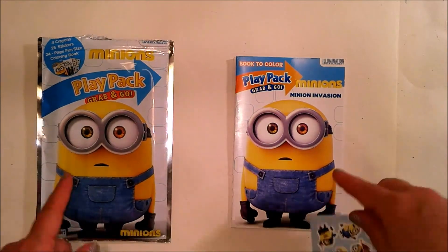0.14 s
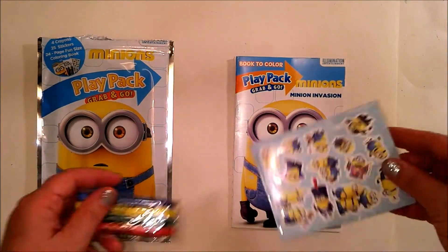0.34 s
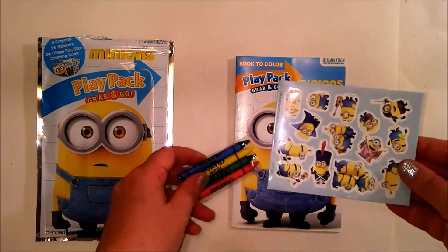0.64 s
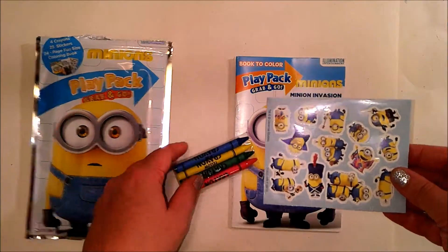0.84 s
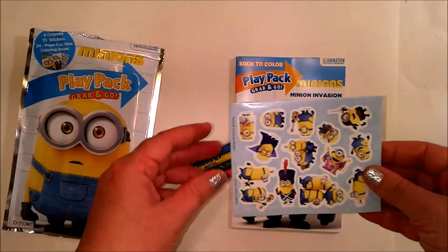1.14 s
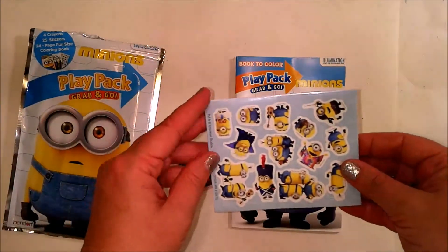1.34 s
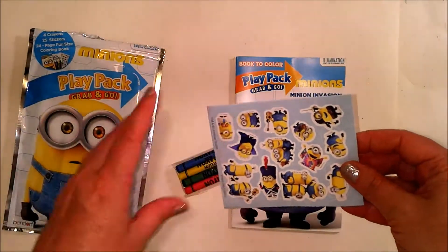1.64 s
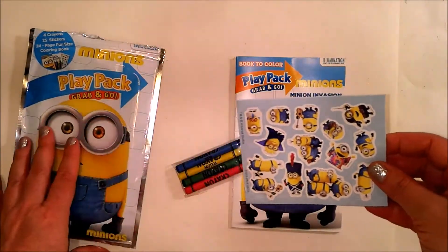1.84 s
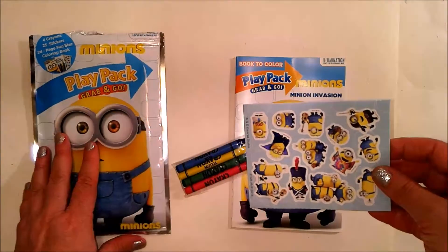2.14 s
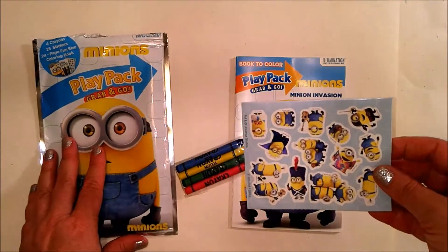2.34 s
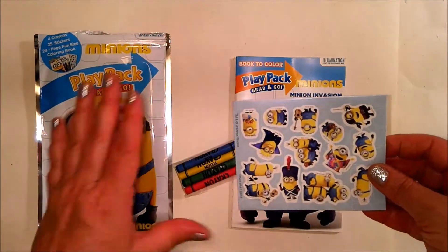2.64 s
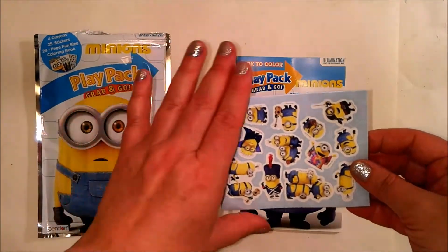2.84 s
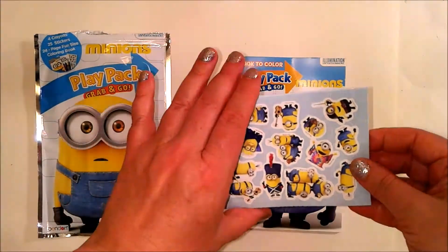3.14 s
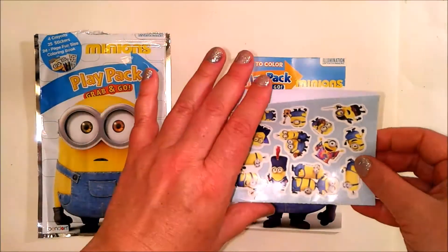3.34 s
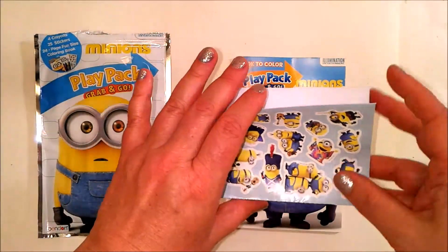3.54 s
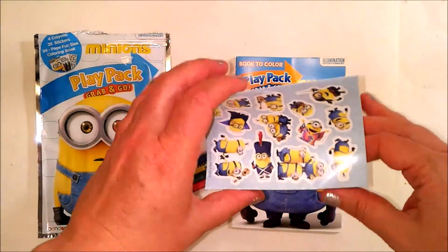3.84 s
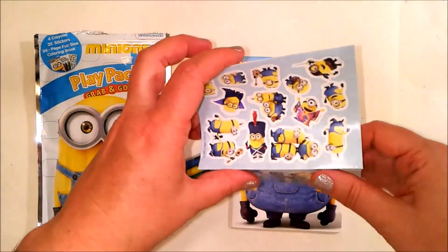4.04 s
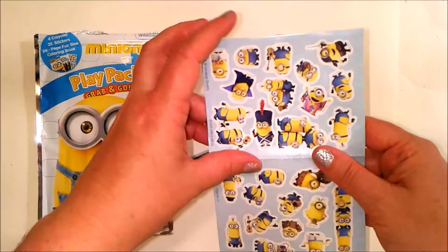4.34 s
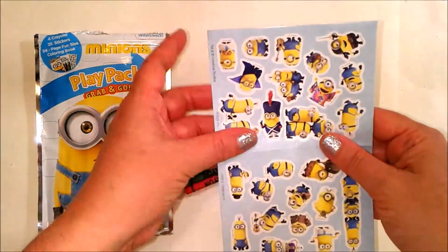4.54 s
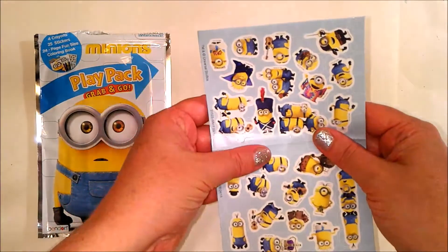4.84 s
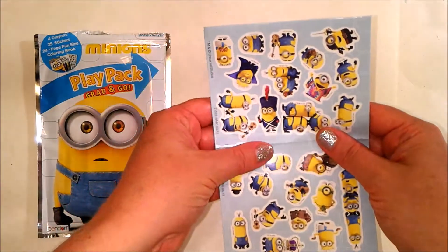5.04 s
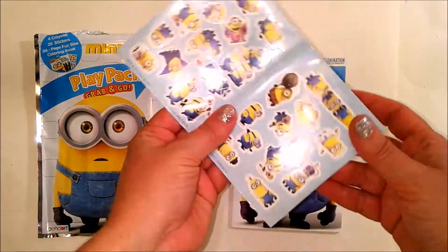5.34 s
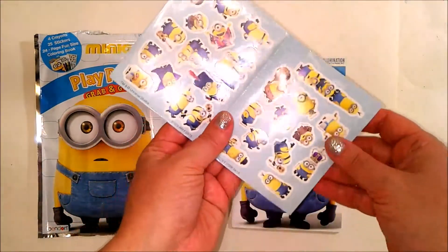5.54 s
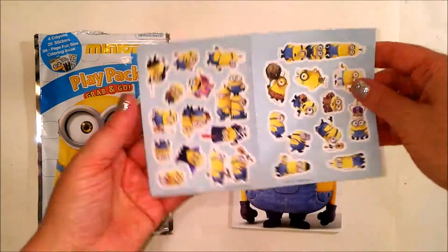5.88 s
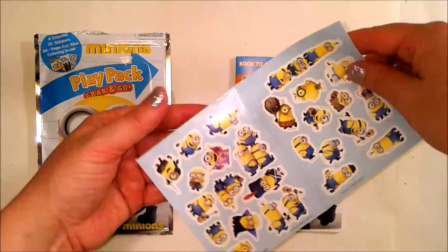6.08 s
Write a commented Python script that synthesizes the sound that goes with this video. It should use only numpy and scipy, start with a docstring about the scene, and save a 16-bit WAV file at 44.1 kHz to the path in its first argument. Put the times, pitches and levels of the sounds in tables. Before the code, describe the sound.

Close to a desk microphone in a small room, hands set crayons down with one woody knock and a quick rattle, the loudest sound. Light taps follow, and a foil pouch slides and snaps faintly. Fingers then rub and open a stiff sheet of stickers, which rustles quietly and pops dully as it bends. Low swells of stirred air come and go over a steady faint hiss, hum and whine.

```python
"""Light clicks and a low fingertip drone sound over the hiss, hum and whine of a close desk microphone.
A bundle of crayons clacks onto a table, exciting the top's normal modes, and rattles as it settles.
A foil pouch is pushed aside and a dent in it snaps through. Then a stiff sticker sheet is unfolded and
turned: stick-slip friction makes it hiss, and buckling makes it pop softly.
The hands stir slow swells of air, and a small room adds short reverberation."""
import sys
import numpy as np
from scipy import signal
from scipy.fft import rfft, irfft, next_fast_len
from scipy.io import wavfile

SR = 44100
rng = np.random.default_rng(int(sys.argv[2]) if len(sys.argv) > 2 else 0)


def to_wav(s):
    """Save 16-bit WAV."""
    ch = np.atleast_2d(s).T  # columns
    pcm = np.round(np.clip(ch, -1, 1) * 32767)  # PCM
    wavfile.write(sys.argv[1], SR, pcm.astype(np.int16))


N = 273816
TIME = np.arange(N) / SR


def undb(db):
    """Decibels to amplitude ratio."""
    return 10 ** (np.asarray(db) / 20)


def unit(x):
    """Normalisation to rms 1."""
    return x / np.sqrt(np.mean(x ** 2))


def add(out, start_s, x):
    """Superposition: x joins out from start_s."""
    i = int(start_s * SR)
    out[i:i + len(x)] += x[:N - i]


def convolve(x, response):
    """Convolution: x drives a linear system with this impulse response."""
    return signal.fftconvolve(x, response)[:len(x)]


def gains(points, size):
    """Frequency response at each transform bin, interpolated from (Hz, dB) points."""
    hz, db = np.transpose(points)
    bin_hz = np.arange(size // 2 + 1) * SR / size
    return undb(np.interp(np.log(bin_hz + 1), np.log(hz), db))


def colour(x, points):
    """Spectral shaping by (Hz, dB) points, at rms 1."""
    return unit(irfft(rfft(x) * gains(points, N), N))


def minimum_phase(points, size):
    """Minimum phase gives a (Hz, dB) spectrum its most compact impulse response."""
    cepstrum = irfft(np.log(gains(points, size)))
    cepstrum[1:size // 2] *= 2
    cepstrum[size // 2 + 1:] = 0
    return irfft(np.exp(rfft(cepstrum)))


def resonate(x, hz, width_hz, stages=1):
    """Resonance: identical damped oscillators in series, gain 1 at the centre."""
    for _ in range(stages):
        x = signal.lfilter(*signal.iirpeak(hz, hz / width_hz, fs=SR), x)
    return x


def decay(t, t60):
    """Exponential damping: 60 dB down after t60 seconds."""
    return np.exp(-np.log(1000) * t / t60)


def modes(table, size, polarity=1):
    """Free vibration is a sum of damped normal modes; polarity -1 alternates their signs."""
    t = TIME[:size]
    return sum(polarity ** k * undb(db) * np.sin(2 * np.pi * hz * t) * decay(t, t60)
               for k, (hz, db, t60) in enumerate(table))


def wander(per_second):
    """Random modulation: Gaussian values joined by straight lines."""
    return np.interp(TIME * per_second, np.arange(N), rng.standard_normal(N))


def swells(table):
    """An envelope of superposed Gaussian rises and falls."""
    return sum(undb(db) * np.exp(-((TIME - peak_s) / half_s) ** 2) for peak_s, half_s, db in table)


def slips(per_second, scatter_db):
    """Stick-slip friction as a Poisson train of impulses of uneven size."""
    strength = undb(scatter_db * np.minimum(rng.exponential(size=N), 5))
    return (rng.random(N) < per_second / SR) * strength * rng.standard_normal(N)


def reflections(x, t60_low=0.29, t60_high=0.25, near_s=0.0062, gap_s=0.0012):
    """Reverberation from the table and walls; absorption takes the treble first."""
    t = TIME[:SR // 2]
    noise = rng.standard_normal(len(t))
    low = signal.sosfilt(signal.butter(2, 1500, fs=SR, output="sos"), noise)
    tail = low * decay(t, t60_low) + (noise - low) * decay(t, t60_high)
    tail *= (t > gap_s) * (1 + 2 * np.exp(-t / near_s))  # the nearest surfaces answer loudest
    return convolve(x, tail / np.sqrt(np.sum(tail ** 2)))


def room(x, wet_db):
    """Direct sound plus the reverberant field."""
    return x + undb(wet_db) * reflections(x)


# Room rumble and microphone hiss. Each row: frequency in Hz, relative level in dB.
NOISE_FLOOR = [(20, 18), (32, 17), (46, 28), (62, 15.5), (85, 11), (160, 7), (450, -1.5), (1200, -2.5),
               (2900, -6), (4000, -12), (6800, -14.5), (10500, -5), (15500, -1.5)]
# Hum and faint whines. Each row: frequency in Hz, rms level in dB.
STEADY_TONES = [(59.5, -67), (806, -82.5), (1611, -101), (2681, -86)]


def background(floor_db=-59.5, whine_hz=4820, whine_width_hz=190, whine_db=-73):
    """Stationary noise: broadband rumble and hiss, a narrow whistling band and pure tones."""
    floor = undb(floor_db) * colour(rng.standard_normal(N), NOISE_FLOOR)
    band = resonate(rng.standard_normal(N), whine_hz, 2 * whine_width_hz)
    whine = undb(whine_db) * unit(resonate(band, whine_hz, whine_width_hz))
    tones = sum(undb(db) * np.sqrt(2) * np.sin(2 * np.pi * (hz * TIME + rng.random()))
                for hz, db in STEADY_TONES)
    return floor + whine + tones


# Fingertip drags. Each row: peak time in seconds, half length in seconds, level in dB.
FINGER_DRAGS = [(.1, 0.15, -71), (.7, 0.17, -65.5), (2.35, 0.16, -74.5), (3.8, 0.12, -74),
                (4.34, 0.24, -67), (6.18, 0.079, -63.5)]


def drags(hz=335, width_hz=115):
    """Forced vibration: soft fingertip slips drive one low bending mode of the card."""
    friction = slips(per_second=790, scatter_db=-6.0)
    return unit(resonate(friction, hz, width_hz, stages=2)) * swells(FINGER_DRAGS)


# The sharp edge of a click. Each row: frequency in Hz, gain in dB.
EDGE_SPECTRUM = [(200, 7), (1000, 0), (2200, 2), (4000, -2.5), (5600, 7.5), (6300, 5), (7700, -11),
                 (9000, -13), (10300, 2.5), (12700, 6), (15500, 3)]


def click(hz, width_hz, edge_db, contact_hz=7860, size=1024):
    """Impulse response of a small object: a damped ring and a sharp edge, band-limited by the contact."""
    ring = resonate(signal.unit_impulse(size), hz, width_hz, stages=2)
    edge = undb(edge_db) * minimum_phase(EDGE_SPECTRUM, size)
    return signal.sosfilt(signal.butter(4, contact_hz, fs=SR, output="sos"), 2 * ring - edge)


def disperse(x, hz=2400, width_hz=2200):
    """Dispersion: bending waves travel at unequal speeds, spreading a click over about a millisecond."""
    for _ in range(2):
        x = x - 2 * resonate(x, hz, width_hz)  # all-pass: only the phase changes
    return x


# Light contacts. Each row: start in seconds, gain in dB, ring frequency in Hz, ring bandwidth in Hz,
# relative edge gain in dB, share sent into the room in dB.
LIGHT_CONTACTS = [(0.0552, -27, 1390, 2670, -4.5, 0), (0.283, -35.5, 1900, 3000, -5.5, 4.5),
                  (0.4127, -24.5, 5670, 1800, -1, 0), (0.6999, -28, 3530, 4900, -6, 0.5),
                  (0.6991, -13.5, 2040, 790, -31, -1), (.751, -34, 2800, 3020, -8, 0),
                  (0.854, -21.5, 1710, 3580, -14, 4.5), (0.9104, -10, 1890, 1600, -19, -1),
                  (0.91, -24, 5800, 2000, -4, -8), (0.9126, 3.5, 1070, 327, -24, -6),
                  (.9133, -1.5, 1350, 450, -28, -2), (0.9142, -8, 2910, 1290, -30, -3),
                  (0.9226, -18, 2270, 1600, -26, 3), (0.967, -31, 2900, 1800, -6, -1),
                  (1.051, -36, 2190, 1400, -22, -1), (1.8701, -19.5, 2440, 3720, -5, -0.5),
                  (1.8726, -32, 3000, 3000, -2, 0), (1.926, -34, 3500, 2500, -10, -1),
                  (1.9797, -15, 1430, 300, -24, -2), (1.981, -16.5, 2260, 600, -11, -3),
                  (2.3775, -23, 3730, 3000, -2.5, -1), (2.392, -36, 4470, 4000, 0, -9),
                  (3.3646, -36, 2950, 5000, 0, 4), (4.294, -31, 1980, 3000, -21, -2),
                  (5.3798, -33.5, 2400, 4500, -2, -5), (5.427, -31.5, 3200, 4500, -2, -5),
                  (5.4692, -35, 3000, 5000, -2, -5), (5.5112, -36, 3400, 5000, -2, -5),
                  (5.8605, -33, 4800, 3960, 0.5, -5)]


def clicks():
    """Directivity: clicks of crayons, nails, foil and fold face either the microphone or the room."""
    direct, sent = np.zeros((2, N))
    for start_s, db, hz, width_hz, edge_db, room_db in LIGHT_CONTACTS:
        tick = undb(db) * click(hz, width_hz, edge_db)
        add(direct, start_s, tick)
        add(sent, start_s, undb(room_db) * tick)
    return disperse(direct + reflections(sent))


# Crayon striking crayon. Each row: start in seconds, gain in dB.
CRAYON_IMPACTS = [(.419, -25.5), (0.419, -51), (0.6996, -43)]
# Modes of the sticks. Each row: frequency in Hz, relative level in dB, 60 dB decay time in seconds.
CRAYON_MODES = [(5030, -28, 0.0017), (5650, -5.5, 0.015), (6030, -6.5, 0.015), (6800, -3.5, 0.0026),
                (8900, -5, 0.0029), (9850, -7, 0.0026), (10180, -2.5, 0.0028), (11500, -8, .0015),
                (14100, -6, .0007)]


def clacks():
    """Impact excitation: hard contacts ring the crayons' high modes for a few milliseconds."""
    out, ring = np.zeros(N), modes(CRAYON_MODES, SR // 20)
    for start_s, db in CRAYON_IMPACTS:
        add(out, start_s, undb(db) * ring)
    return signal.sosfilt(signal.butter(2, 3000, "high", fs=SR, output="sos"), out)


def stroke(start_s, rise_s, fall_s):
    """Friction noise grows as the square root of speed, which rises and falls in a smooth arch."""
    phase = np.interp(TIME, [start_s, start_s + rise_s, start_s + rise_s + fall_s], [0, np.pi / 2, np.pi])
    return np.sqrt(np.abs(np.sin(phase)))


def flicker(x, count=14, depth_db=2.3, per_second=40):
    """Amplitude modulation: as the contact patch shifts, each band swells and fades on its own."""
    size = next_fast_len(N, real=True)
    bin_hz = np.arange(size // 2 + 1) * SR / size
    place = np.interp(np.log(bin_hz + 1), np.log([1000, 12000]), [0, count - 1])
    spectrum = rfft(x, size)
    bands = (irfft(spectrum * np.maximum(1 - np.abs(place - k), 0), size)[:N] for k in range(count))
    return unit(sum(band * undb(depth_db * wander(per_second)) for band in bands))


# Bending modes of the stiff sheet. Each row: frequency in Hz, bandwidth in Hz, relative gain in dB.
SHEET_MODES = [(163, 220, 3.5), (337.6, 31, 8), (434, 41, 1), (626, 150, -1.5), (760, 87, 0.5),
               (980, 70, -6.5), (1540, 470, -1.5), (2590, 240, -6.5)]


def sheet(force):
    """A sounding board: the sheet radiates a force through its broad resonances, at rms 1."""
    return unit(sum(undb(db) * resonate(force, hz, width_hz) for hz, width_hz, db in SHEET_MODES))


# Paper and skin sliding. Each row: start in seconds, acceleration time in seconds,
# deceleration time in seconds, hiss level in dB, sizzle relative to the hiss in dB.
SLIDING_STROKES = [(0.695, 0.02, 0.063, -67, -2), (.816, .003, 0.044, -60, -2),
                   (0.852, 0.022, 0.028, -54, -14), (1.845, 0.017, 0.58, -64, -4),
                   (2.39, .02, 0.082, -75, -7), (3.135, 0.036, 0.024, -66.5, -21),
                   (3.225, 0.019, 0.014, -68.5, 6.5), (3.27, .04, .04, -81, -4),
                   (3.39, 0.047, 0.16, -69, 2), (3.742, 0.055, 0.069, -57.5, -13),
                   (3.865, 0.019, .04, -65, 1), (3.984, 0.054, 0.054, -61, -3),
                   (4.095, 0.024, 0.12, -59.5, -26), (4.245, 0.016, 0.08, -59, -4.5),
                   (4.34, 0.096, 0.04, -70, -6), (4.567, 0.043, 0.013, -60.5, -4),
                   (4.70, 0.1, 0.048, -68.5, -6), (5.144, 0.051, 0.044, -60.5, -7.5),
                   (5.3, 0.022, 0.1, -81, 7), (5.52, 0.12, 0.034, -64.5, 0),
                   (5.768, 0.011, 0.08, -64.5, 7.5), (5.857, .004, 0.053, -59, 1),
                   (5.918, 0.023, 0.026, -62.5, 4), (5.957, 0.0054, 0.028, -66, 3),
                   (6.028, 0.024, 0.066, -62.5, 0), (6.15, 0.017, 0.053, -62, -10)]
# Low rustle of the flexing sheet, held beyond the end rows. Each row: time in seconds, level in dB.
FLEX_LEVELS = [(3.2, -74.5), (3.7, -68.5), (4.35, -70), (4.8, -70.5), (5.15, -73.5), (5.5, -62),
               (5.75, -64), (6.0, -71.5), (6.2, -66)]
# Hiss of sliding fibres. Each row: frequency in Hz, relative level in dB.
FIBRE_SPECTRUM = [(500, -41), (1200, -14), (1650, -5.5), (2100, -7.5), (2500, -4), (2950, -4), (3700, -4.5),
                  (5000, -1), (5800, -2), (6400, -7.5), (7500, -11), (16000, -21)]
# Sizzle of skin on the glossy face and cut edge. Each row: frequency in Hz, relative level in dB.
SIZZLE_SPECTRUM = [(3000, -24), (5000, -1.5), (5450, -1), (5800, 6), (6250, -6.5), (7200, -9), (8500, -5),
                   (10500, -6), (13000, -5.5), (16000, -7)]


def sliding(body_db=-10, creep_db=-10, grip_db=2.35, grip_per_second=90):
    """Friction noise: slips hiss and shake the sheet under a wavering grip; incoherent powers add."""
    hiss_power, sizzle_power = np.zeros((2, N))
    for start_s, rise_s, fall_s, db, sizzle_db in SLIDING_STROKES:
        power = (stroke(start_s, rise_s, fall_s) * undb(db)) ** 2
        hiss_power += power
        sizzle_power += power * undb(sizzle_db) ** 2
    flex_power = undb(np.interp(TIME, *np.transpose(FLEX_LEVELS))) ** 2
    body_power = flex_power + hiss_power * undb(body_db) ** 2
    hiss_power += flex_power * undb(creep_db) ** 2  # the bending sheet creeps under the fingers
    coarse, fine = (flicker(slips(per_second=12000, scatter_db=1)) for _ in range(2))
    hiss = np.sqrt(hiss_power) * colour(coarse, FIBRE_SPECTRUM)
    body = np.sqrt(body_power) * sheet(coarse)
    sizzle = np.sqrt(sizzle_power) * colour(fine, SIZZLE_SPECTRUM)
    grip = undb(grip_db * wander(grip_per_second))
    return grip * (hiss + body + sizzle)


# Blows on the table top. Each row: start in seconds, impulse in dB, contact time in milliseconds.
TABLE_BLOWS = [(0.706, -25, 4.6), (0.854, -30, 0.55), (0.9097, -21, 1.04), (0.9142, -7.5, 0.37),
               (0.915, -3.5, 1.57), (0.9176, -8, 1.02), (0.9203, -10, 0.84), (0.927, -7, 5.1),
               (.948, -19, 1.27), (1.981, -32.5, 0.83)]
# The loaded table top. Each row: frequency in Hz, relative level in dB, 60 dB decay time in seconds.
TABLE_MODES = [(64.2, -26, 0.13), (96, -37, 0.29), (120, -35, 0.28), (142.8, -33, 0.26),
               (174.6, -34.5, 0.35), (220.3, -33, 0.17), (272, -35, 0.21), (350, -25, 0.13),
               (412, -27.5, 0.11), (436, -26.5, 0.083), (458, -34, 0.085), (508, -39, 0.21),
               (820, -44, 0.14), (980, -36, 0.12), (1052, -36, 0.12), (1096, -33, 0.16), (1132, -37, 0.094),
               (1314, -23, 0.069), (1398, -29, 0.096), (1530, -38, 0.13), (2120, -27, 0.051)]


def knocks(radiate_hz=48):
    """Contact time sets bandwidth: a longer half-sine push reaches only the table's low modes."""
    force, t = np.zeros(N), TIME[:SR // 2]
    for start_s, db, contact_ms in TABLE_BLOWS:
        push = np.sin(np.pi * np.minimum(t * 1000 / contact_ms, 1))
        add(force, start_s, undb(db) * push / push.sum())
    vibration = convolve(force, modes(TABLE_MODES, len(t)))
    # the slowest motion moves too little air to be heard
    return signal.sosfilt(signal.butter(2, radiate_hz, "high", fs=SR, output="sos"), vibration)


# Woody tone of jostling crayons. Each row: frequency in Hz, relative level in dB.
WAX_SPECTRUM = [(300, -7), (460, 6), (700, -8), (1060, 8), (1400, -3.5), (1700, -5.5), (3000, -16),
                (4200, -29), (5600, -29), (7000, -26), (16000, -21)]


def rattle(start_s=0.914, db=-37.0, fade_s=0.031, size=SR // 4):
    """Exponential decay: random collisions among the crayons shrink as the bundle settles."""
    contacts = colour(slips(per_second=1300, scatter_db=-2.0), WAX_SPECTRUM)
    out = np.zeros(N)
    add(out, start_s, undb(db) * contacts[:size] * np.exp(-TIME[:size] / fade_s))
    return out


# Swells of stirred air. Each row: peak time in seconds, half length in seconds, level in dB.
AIR_SWELLS = [(1.03, 0.4, -56.5), (1.493, 0.045, -52.5), (5.5, 0.076, -54), (5.95, 0.81, -57.5)]
# Their rumble. Each row: frequency in Hz, relative level in dB.
AIR_SPECTRUM = [(15, -8.5), (28, -10.5), (55, -3.0), (85, -19.0), (200, -33), (2000, -62)]


def wafts():
    """Air displacement: the hands and waving sheet push low-frequency pressure at the microphone."""
    return colour(rng.standard_normal(N), AIR_SPECTRUM) * swells(AIR_SWELLS)


# Buckles of the sheet. Each row: start in seconds, relative level in dB, centre frequency in Hz.
BUCKLES = [(2.275, -39, 696), (2.286, -31, 922), (3.2120, -25.5, 780), (3.8270, -26.5, 477),
           (4.0210, -34, 480), (4.4485, -10.5, 517), (5.7133, -18, 584)]
# The ring after a pop. Each row: frequency in Hz, relative level in dB, 60 dB decay time in seconds.
HOLLOW_MODES = [(348, -43, 0.22), (443, -41, 0.12), (570, -52, .1), (650, -42, 0.082), (857, -40.5, 0.075),
                (967, -37, 0.096), (1770, -33, 0.061)]


def pops(relative_width=1.55, cutoff_hz=1950, ring_db=-6, size=SR // 5):
    """Buckling: the sheet flips through a bend in a dull, heavily damped swing, then rings hollow."""
    swings = np.zeros(N)
    for start_s, db, hz in BUCKLES:
        swing = resonate(signal.unit_impulse(size), hz, relative_width * hz, stages=2)
        add(swings, start_s, 3 * undb(db) * swing)
    dull = signal.sosfilt(signal.butter(5, cutoff_hz, fs=SR, output="sos"), swings)
    return dull + undb(ring_db) * convolve(dull, modes(HOLLOW_MODES, size))


# Modes of the foil dent. Each row: frequency in Hz, relative level in dB, 60 dB decay time in seconds.
FOIL_MODES = [(760, -22, 0.056), (970, -16.5, 0.031), (2340, 4, 0.0063), (3150, 1, 0.013),
              (4000, -9, 0.019), (5450, 3.5, 0.0068), (5870, -19, .01), (8950, -22, 0.0053),
              (10100, -9, 0.0015)]


def foil_snap(start_s=2.3126, db=-34.5):
    """Snap-through: a dent in the pouch flips under the hand and rings quickly damped modes."""
    out = np.zeros(N)
    add(out, start_s, undb(db) * modes(FOIL_MODES, SR // 10, polarity=-1))
    return out


def scene():
    """Superposition: the handling, its reflections and the steady background sum to one channel."""
    contacts = clicks() + room(clacks(), wet_db=-1.5)
    foil = room(foil_snap(), wet_db=-3)
    table = room(knocks() + rattle(), wet_db=-10)
    paper = room(pops(), wet_db=-4.5) + room(sliding(), wet_db=-6) + drags()
    return (contacts + foil + table + paper + wafts() + background())[None]


def record(dry):
    """Band limiting: a steep low-pass removes the highest treble."""
    cutoff_hz = 15850
    return signal.sosfilt(signal.ellip(10, 0.2, 70, cutoff_hz, fs=SR, output="sos"), dry)


dry = scene()
out = record(dry)
to_wav(out)
```